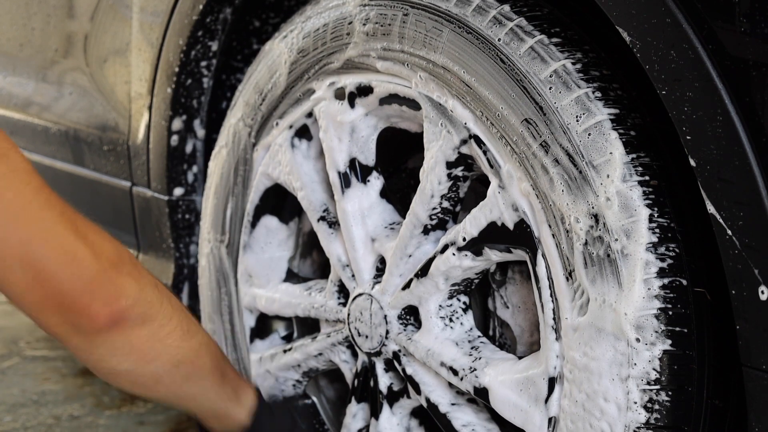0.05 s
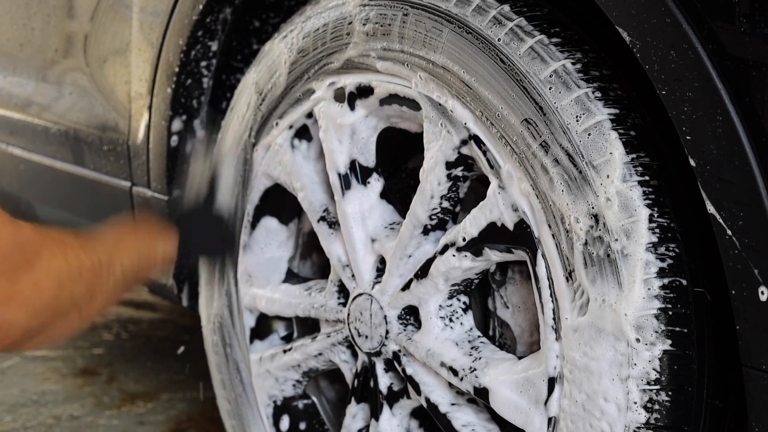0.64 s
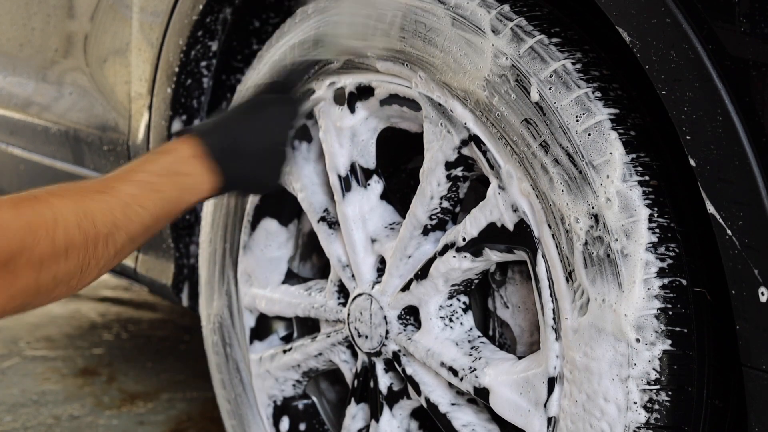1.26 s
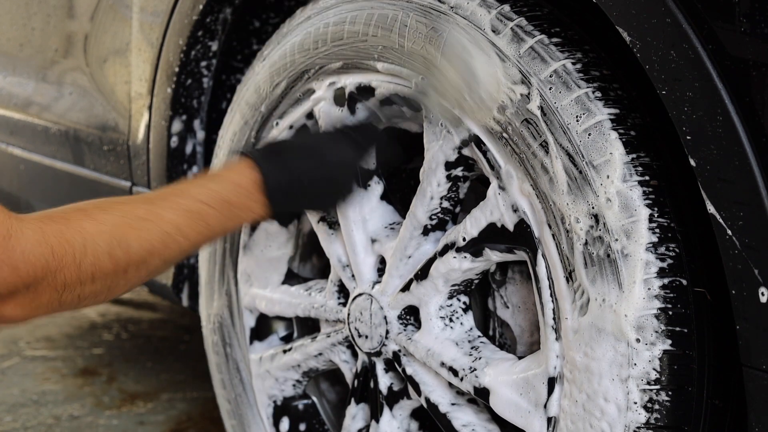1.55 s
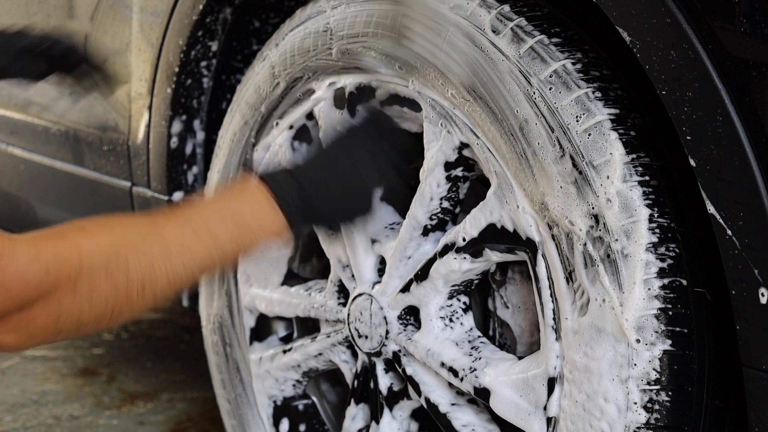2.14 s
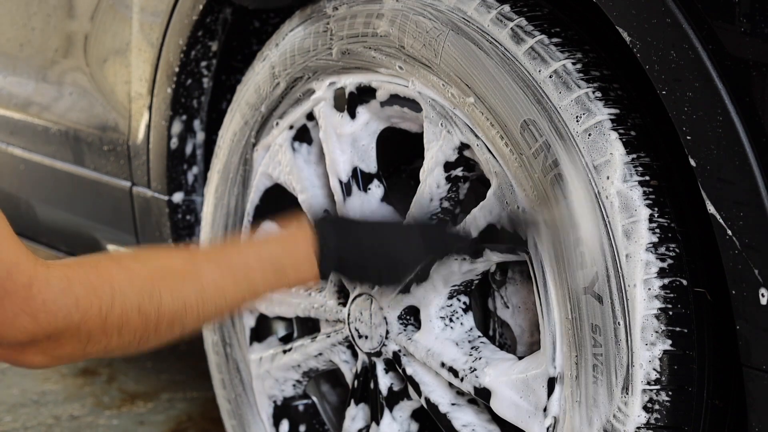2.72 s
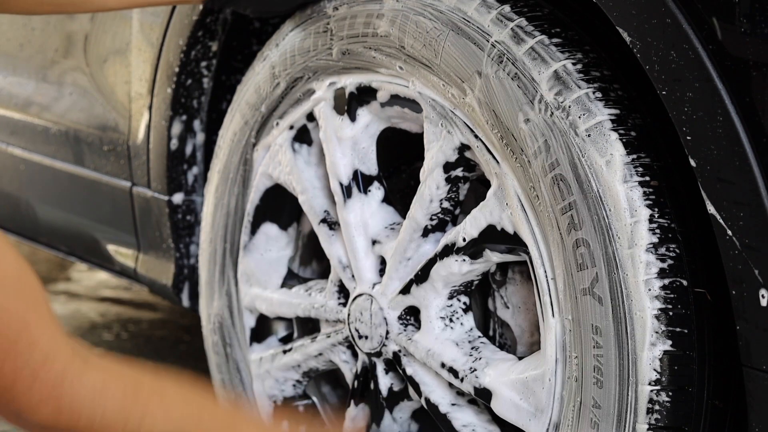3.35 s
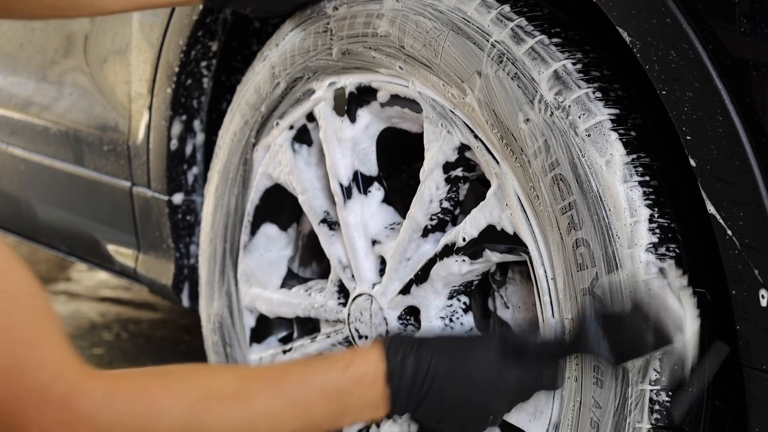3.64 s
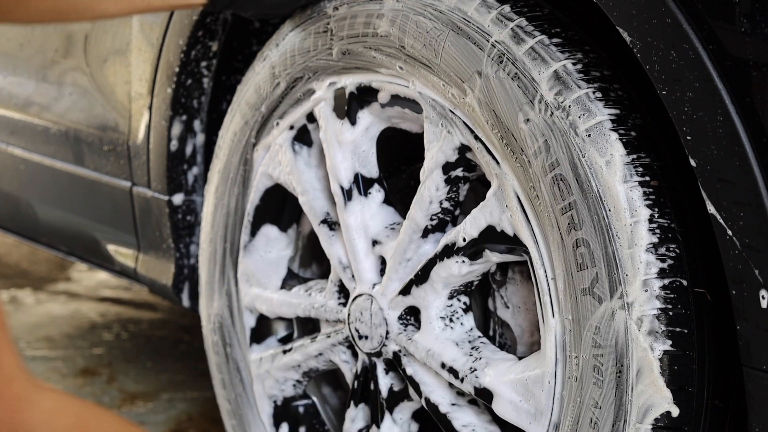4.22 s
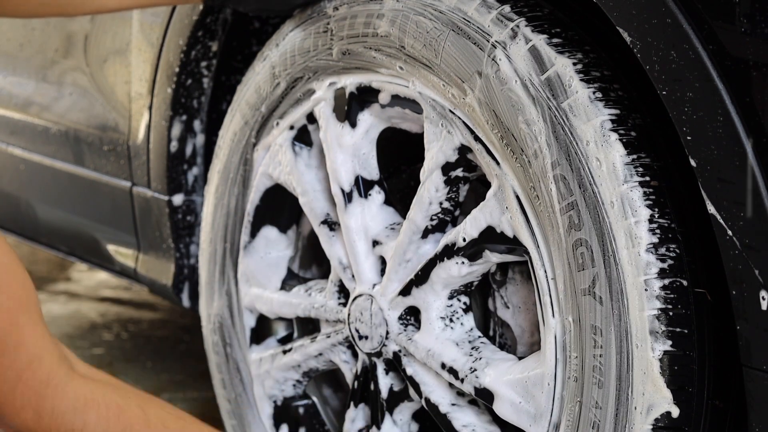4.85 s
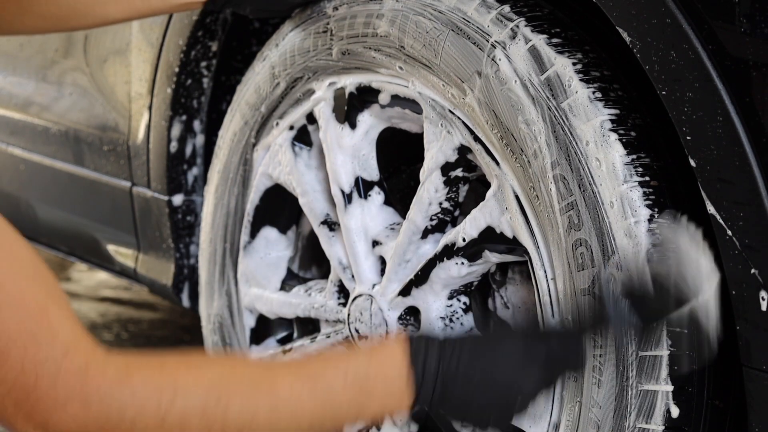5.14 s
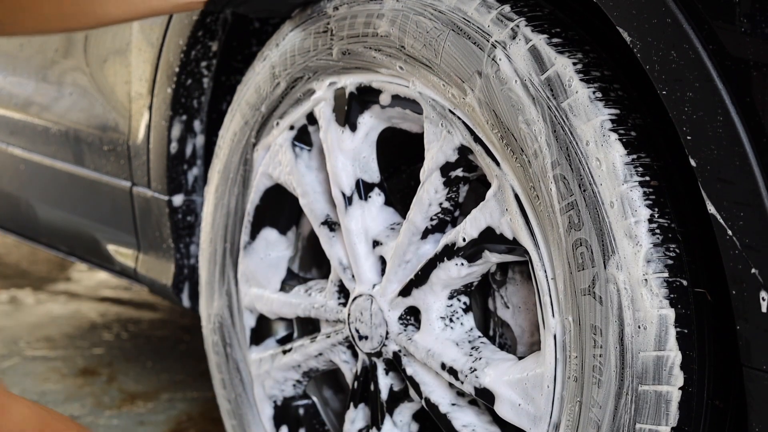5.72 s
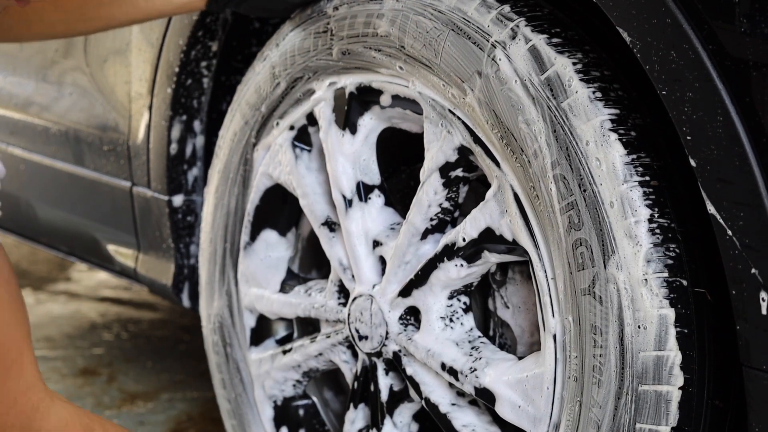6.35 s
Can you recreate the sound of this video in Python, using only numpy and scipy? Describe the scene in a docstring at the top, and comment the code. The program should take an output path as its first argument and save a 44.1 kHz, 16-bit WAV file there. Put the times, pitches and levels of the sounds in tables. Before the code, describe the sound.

Rapid back-and-forth brushing on a foamy tire, bristles hissing and zipping over the rubber, twice knocking lightly against the wheel.

```python
"""Outdoors in a yard, the microphone close to a soapy car tyre being scrubbed with a stiff brush.
Bristles hiss and crackle through the foam, back and forth, and zip in rising and falling tones as they
sweep the fine ribs of the sidewall. Twice the brush sticks and hoots on the rubber; three times its
head knocks the wheel. The lather fizzes, the yard gives a short echo, and a steady outdoor wash and
a low hum lie behind."""
import sys
import numpy as np
from scipy import signal
from scipy.fft import rfft, irfft, next_fast_len
from scipy.io import wavfile

SR = 44100
rng = np.random.default_rng(int(sys.argv[2]) if len(sys.argv) > 2 else 0)


def transcribe(signal):
    """Save signal, clipped to [-1, 1], as a 16-bit WAV file at the path in sys.argv[1]."""
    frames = np.atleast_2d(signal).T
    limited = np.clip(frames, -1, 1)
    pcm = np.round(limited * 32767).astype(np.int16)
    wavfile.write(sys.argv[1], SR, pcm)


N = 281358
TOP_HZ = 15950  # upper edge of the band

# Swings of the hand: start_s, end_s, lean (higher is fastest later), pressure_db, growth_db
BRUSH_STROKES = [(0, .07, 0.78, -6, -10), (0.043, .149, 1.18, 7.5, 9), (0.208, 0.423, 1.15, 2, 5.5),
                 (0.44, 0.561, 1.43, 7, 4), (.598, .828, .93, 2.5, 13.5), (.877, 0.988, 1.07, 4.5, 11),
                 (1.021, 1.21, 1.18, 4, 7), (1.23, 1.375, 1.48, 2, 12), (1.416, 1.559, 1.33, 5, -10),
                 (1.586, 1.711, 1.15, 2, 1), (1.754, 1.887, 0.98, 6.5, -1.5), (1.941, 2.078, 1.01, 0.5, -2),
                 (2.126, 2.28, 1.15, 4, -2), (2.317, 2.444, 1.12, -1, 16), (2.502, 2.669, 1.35, 4, -15),
                 (2.708, 2.856, 1.2, 1, -2), (2.908, 3.056, 1.25, 5, -4), (3.108, 3.251, 0.77, 2, -4),
                 (3.306, 3.5, 1.11, 0, -8), (3.546, 3.706, 1.14, 1.7, -3), (3.745, 3.932, 1.3, 1, -10),
                 (3.965, 4.118, 0.79, 6, 18), (4.168, 4.307, 1.25, 3, -15), (4.358, 4.615, 1.03, -0.5, -9),
                 (4.662, 4.911, 1.5, 1, 3.5), (4.958, 5.143, 1.09, -4.5, -22), (5.181, 5.391, 1.26, 3, 9),
                 (5.436, 5.594, 1.05, -0.5, 13), (5.633, 5.82, 0.9, 3.5, -1), (5.833, 5.999, 1.53, -6, 17),
                 (6.055, 6.229, 1.14, 0.5, -4), (6.25, 6.473, 1.15, -3.5, 15)]
# Blows of the brush head on the wheel: start_s, level_db, hardness_hz (low-pass on the blow)
WHEEL_KNOCKS = [(3.117, -14, 2400), (3.881, -1.5, 2600), (5.341, -2, 1000)]
# Bright spectrum of bristles and bubbles: frequency_hz, level_db
HISS_SPECTRUM = [(1500, -24), (3000, -0.5), (4200, -2.5), (5500, -2), (7000, -0.5), (8400, 2.5),
                 (9500, -3.5), (10700, -10.5), (12800, -5.5), (15800, -13.5)]


def amp(db):
    """Decibels to gain."""
    return 10 ** (np.asarray(db) / 20)


def unit(x):
    """Scales to rms 1."""
    return x / np.sqrt(np.mean(abs(x) ** 2) + 1e-20)


def read(points, hz):
    """Reads a table on a log-frequency axis."""
    point_hz, value = np.transpose(points)
    return np.interp(np.log(hz + 1), np.log(point_hz + 1), value)


def add(mix, start_s, sound):
    """Mixes a sound in at start_s."""
    part = mix[max(round(start_s * SR), 0):][:len(sound)]
    part += sound[:len(part)]


def colour(x, spectrum):
    """Filters x by a spectrum and scales it to rms 1."""
    size = next_fast_len(N)
    gain = amp(read(spectrum, np.fft.rfftfreq(size, 1 / SR)))
    return unit(irfft(rfft(x, size) * gain, size)[:N])


def wander(width_hz, size):
    """Complex noise of rms about 1 that changes as fast as a band of this width."""
    hz = np.fft.fftfreq(next_fast_len(size + 2048), 1 / SR)
    noise = rng.standard_normal(len(hz)) + 1j * rng.standard_normal(len(hz))
    return unit(np.fft.ifft(noise * np.exp(-2 * np.log(2) * (hz / width_hz) ** 2)))[:size]


def snaps(per_s, spread_db):
    """A random train of tiny clicks, a few larger than the rest."""
    size = amp(spread_db * np.minimum(rng.exponential(1, N), 5))
    return unit(size * rng.choice([-1, 1], N) * (rng.random(N) < per_s / SR))


def hand_speed(progress, lean, run_up=.167):
    """Brush speed (0-1) along a stroke; the bent bristles let go with the swing already under way."""
    swing = np.clip(run_up + (1 - run_up) * progress, 0, 1)
    return abs(np.sin(np.pi * swing ** lean)) ** .82


def contact(lift_s=0.099):
    """How well the bristles touch (0-1): a knock bounces them off the tyre for a moment."""
    t, touch = np.arange(N) / SR, np.ones(N)
    for start, db, _ in WHEEL_KNOCKS:
        touch *= 1 - min(amp(db), 1) * (t > start) * np.exp(-abs(t - start) / lift_s)
    return touch


def scrub(hiss_db=-32.5, swish_db=-32, bite_s=0.0049, spring_s=0.015, settle_db=-12, settle_s=.03,
          flicker_db=1.67, flicker_hz=130):
    """Countless bristles slip and flick through the foam, hissing most where the brush is fastest."""
    # Duller spectrum of the wet rubbing: frequency_hz, level_db
    swish_spectrum = [(200, -27), (500, -4), (1000, 0), (1500, 2), (2200, 0), (2800, -2), (3800, -3.5),
                      (5000, -8.5), (8000, -16)]
    hiss_level, swish_level = np.zeros((2, N))
    for start, end, lean, db, growth_db in BRUSH_STROKES:
        progress = np.linspace(0, 1, round((end - start) * SR))
        t = progress * (end - start)
        bite = np.minimum(t / bite_s, 1)
        speed = hand_speed(progress, lean)
        pressure = amp(db + growth_db * (progress - .5))
        flick = 1 + 0.58 * np.exp(-t / spring_s)  # the bristles spring over at each turn
        add(hiss_level, start, bite * pressure * speed ** 1.154)
        # the swish outlasts the hiss, so slow, light rubbing sounds duller
        add(swish_level, start, bite * flick * pressure ** 0.3 * speed ** 0.25)
    hiss_level, swish_level = contact() * [hiss_level, swish_level]
    decay = np.exp(-1 / (settle_s * SR))  # stirred lather fizzes on as it settles
    settling = signal.lfilter([1 - decay], [1, -decay], hiss_level)
    hiss_level = np.hypot(hiss_level, amp(settle_db) * settling)
    # whole tufts catch and let go together
    hiss_level *= unit(amp(flicker_db * unit(wander(flicker_hz, N).real)))
    swish_level *= unit(amp(flicker_db * unit(wander(flicker_hz, N).real)))
    hiss = colour(rng.standard_normal(N) + 0.7 * snaps(per_s=3000, spread_db=1), HISS_SPECTRUM)
    swish = colour(rng.standard_normal(N) + 0.67 * snaps(per_s=900, spread_db=3), swish_spectrum)
    return amp(hiss_db) * hiss_level * hiss + amp(swish_db) * swish_level * swish


def foam(fizz_db=-53):
    """Bubbles keep bursting in the lather, a faint fizz close to the microphone."""
    return amp(fizz_db) * colour(snaps(per_s=430, spread_db=6.5), HISS_SPECTRUM)


def surroundings(wash_db=-36):
    """Behind the brush, a steady outdoor wash with a wavering low hum."""
    # Spectrum of the open air: frequency_hz, level_db
    wash_spectrum = [(22, -32), (35, -12.5), (70, -10), (110, -3), (180, -3.5), (320, -1), (480, -3),
                     (800, -1.5), (1150, -5), (1700, -7.5), (3000, -12.5), (8000, -20.5), (10500, -26),
                     (15800, -38)]
    # Narrow noise bands of the hum: pitch_hz, width_hz, level_db
    hum_bands = [(58, 3.4, -57), (116, 12, -64), (231.4, 15, -48.5), (556, 58, -54.5), (931, 51, -51)]
    t = np.arange(N) / SR
    hum = sum(amp(db) * unit((wander(width, N) * np.exp(2j * np.pi * hz * t)).real)
              for hz, width, db in hum_bands)
    return amp(wash_db) * colour(rng.standard_normal(N), wash_spectrum) + hum


def zip_tone(hz, spread_hz, overtone_db=-1.0, fall_db=3.0, in_step_hz=55, judder_hz=60):
    """A crowd of bristles ticks over ribs: the closer their speeds, the purer and brighter the tone."""
    # Response of the ticking bristles: frequency_hz, level_db
    bristle_spectrum = [(900, -12), (1500, 1.5), (2400, -3), (3400, 1.5), (4600, -0.5), (6000, -1.5),
                        (8300, 4), (10500, -5), (12800, 0), (16000, -3)]
    judder = 1 + 0.02224 * wander(judder_hz, len(hz)).real
    cycles = np.cumsum(hz * judder) / SR
    purity = np.clip(in_step_hz / spread_hz, 0, 1)
    partials = []
    for k in range(1, 7):
        out_of_step = wander(1.62 * spread_hz * k ** 0.25, len(hz))
        crowd = np.sqrt(purity ** k) + np.sqrt(1 - purity ** k) * out_of_step
        gain = amp(read(bristle_spectrum, k * hz) - fall_db * k) * (k * hz < TOP_HZ)
        partials.append(gain * (crowd * np.exp(2j * np.pi * k * cycles)).real)
    return unit(partials[0]) + amp(overtone_db) * purity ** 0.28 * unit(sum(partials[1:]))


def rib_zips(zip_db=0.7, grip_db=4.0, grip_hz=50, fade_s=0.0037, let_go=0.21):
    """Bristles sweep evenly spaced ribs: pitch follows hand speed, level follows speed and pressure."""
    # Patches of sidewall ribs, each followed until the next or the end of the stroke:
    # start_s, full_speed_pitch_hz, level_db, spread_ratio (of pitch among the bristles)
    rib_patches = [(.049, 4136, -25, .075), (.207, 3015, -26, 0.18), (.263, 3360, -25, 0.058),
                   (.45, 3804, -23, 0.092), (.609, 2930, -30, 0.098), (.71, 4200, -28, 0.081),
                   (.881, 4125, -28.5, 0.15), (1.028, 5240, -26, .1), (1.113, 4940, -34, 0.14),
                   (1.243, 3620, -25.5, 0.097), (1.278, 5230, -32.5, 0.064), (1.415, 5600, -27, 0.1),
                   (1.514, 3990, -23.5, 0.093), (1.59, 3710, -31.5, .08), (1.633, 5900, -32, 0.08),
                   (1.752, 5200, -24, 0.14), (1.822, 4870, -20.5, 0.055), (1.95, 3520, -29, .085),
                   (2.017, 4900, -31.5, 0.066), (2.126, 4220, -28.5, 0.11), (2.185, 2974, -26.5, .044),
                   (2.321, 2594, -28, 0.092), (2.401, 4100, -28, 0.099), (2.503, 3976, -27, 0.049),
                   (2.711, 3100, -30.5, .08), (2.911, 3560, -26, 0.074), (3.112, 3210, -23.5, 0.14),
                   (3.15, 3196, -27, .075), (3.311, 3680, -29.5, 0.04), (3.546, 2880, -28.5, 0.052),
                   (3.751, 3844, -28.5, .06), (3.846, 5290, -30, .038), (3.97, 3820, -33.5, 0.061),
                   (4.03, 3015, -29, 0.044), (4.173, 2407, -29.5, .15), (4.242, 4670, -29.5, .064),
                   (4.376, 4750, -36, .063), (4.419, 3700, -27.5, 0.06), (4.739, 3067, -32.5, 0.033),
                   (4.958, 2490, -32.5, .058), (5.24, 3280, -29, .03), (5.464, 2890, -32, 0.063),
                   (5.514, 2140, -29.5, 0.043), (5.642, 2160, -27, 0.11), (5.7, 4240, -30, 0.15),
                   (5.854, 2800, -37, 0.073), (6.056, 4340, -32.5, 0.086)]
    out = np.zeros(N)
    for start, end, lean, _, growth_db in BRUSH_STROKES:
        patches = [row for row in rib_patches if start <= row[0] + .02 < end]
        exits = [row[0] for row in patches[1:]] + [end]
        for (enter, peak_hz, db, spread), leave in zip(patches, exits):
            t = np.arange(enter, leave, 1 / SR)
            progress = (t - start) / (end - start)
            speed = hand_speed(progress, lean)
            pressure = amp(db + 0.57 * growth_db * (progress - .5))
            # lather and lettering break up the contact
            grip = unit(amp(grip_db * np.tanh(unit(wander(grip_hz, len(t)).real))))
            fade = np.sqrt(np.clip(np.minimum(t - enter, leave - t) / fade_s, 0, 1))
            fade *= np.clip((1 - progress) / let_go, 0, 1)  # near the turn the bristles just drag
            tone = zip_tone(peak_hz * speed, peak_hz * spread)
            add(out, enter, pressure * fade * grip * speed ** 0.6 * tone)
    return amp(zip_db) * contact() * out


def shudders(upper_ratio=2.45, upper_width_hz=120, upper_db=-6):
    """The brush sticks and shudders on the rubber: a short hoot with a weaker, rougher tone above."""
    # Moments of sticking: start_s, length_s, pitch_hz, level_db
    hoots = [(1.613, .05, 561, -32), (1.998, 0.04, 493, -27.5)]
    out = np.zeros(N)
    for start, length, hz, db in hoots:
        t = np.arange(0, length, 1 / SR)
        upper = (wander(upper_width_hz, len(t)) * np.exp(2j * np.pi * upper_ratio * hz * t)).real
        tone = unit(np.sin(2 * np.pi * hz * t) + amp(upper_db) * upper)
        swell = np.sin(np.pi * (t / length) ** 0.56)
        add(out, start, amp(db) * swell * tone)
    return out


def knocks(scatter=0.039, scatter_s=0.0061, lowest_hz=470):
    """The hard brush head hits the wheel; the blow scatters briefly among spokes and wheel arch."""
    # Ringing modes of brush head and wheel: pitch_hz, level_db, t60_s
    modes = [(622, 4, 0.027), (703, -15, 0.17), (834, 1.5, 0.026), (977, -1, 0.033), (1312, 6, 0.025),
             (1470, 0, 0.014), (1880, 1.5, 0.024), (3180, -22, .012)]
    out, t = np.zeros(N), np.arange(SR // 5) / SR
    ring = sum(amp(db - 60 * t / t60) * np.cos(2 * np.pi * hz * t) for hz, db, t60 in modes)
    bass_cut = signal.butter(3, lowest_hz, "high", fs=SR, output="sos")  # too small to radiate bass
    ring = signal.sosfilt(bass_cut, ring)
    for start, db, hardness_hz in WHEEL_KNOCKS:
        paths = scatter * rng.standard_normal(len(t)) * np.exp(-t / scatter_s) + (t == 0)
        scattered = signal.fftconvolve(ring, paths)[:len(t)]
        blow = signal.sosfilt(signal.butter(1, hardness_hz, fs=SR, output="sos"), scattered)
        add(out, start, amp(db) * blow / abs(blow).max())
    return out


def yard_echo(x, delay_s=.006):
    """Scattered echoes from ground, car and walls; the bass and the highest treble die first."""
    # Decay of the yard: frequency_hz, t60_s
    decay_times = [(200, 0.19), (1000, 0.42), (3000, 0.62), (6000, 0.75), (14000, 0.29)]
    hz, t, bands = signal.stft(rng.standard_normal(SR // 2), SR, nperseg=256)
    decay = amp(-60 * t / read(decay_times, hz)[:, None])
    tail = signal.istft(bands * decay, SR, nperseg=256)[1]
    tail = np.concatenate([np.zeros(round(delay_s * SR)), tail])
    return signal.fftconvolve(x, tail / np.linalg.norm(tail))[:N]


def scene(brush_echo_db=-13.0, knock_echo_db=-9):
    """One microphone: brush, knocks and foam close up, the open yard behind."""
    brush = scrub() + rib_zips() + shudders()
    blows = knocks()
    echoes = yard_echo(amp(brush_echo_db) * brush + amp(knock_echo_db) * blows)
    return (brush + blows + echoes + foam() + surroundings())[None]


def record(dry, ceiling=0.63):
    """The recorder rounds off the hardest peaks and limits the band."""
    rounded = dry / (1 + (dry / ceiling) ** 6) ** (1 / 6)
    low_pass = signal.firwin(1023, TOP_HZ, window=("kaiser", 10), fs=SR)
    return signal.oaconvolve(rounded, low_pass[None], "same")


dry = scene()
out = record(dry)
transcribe(out)
```